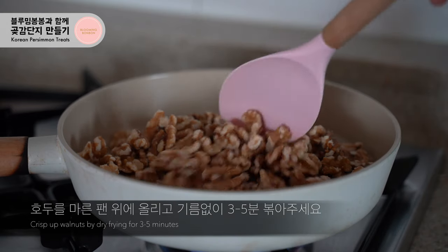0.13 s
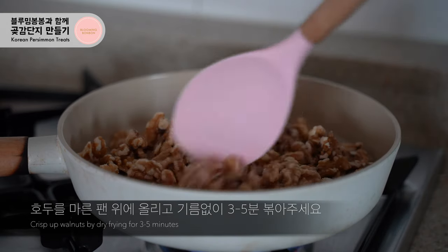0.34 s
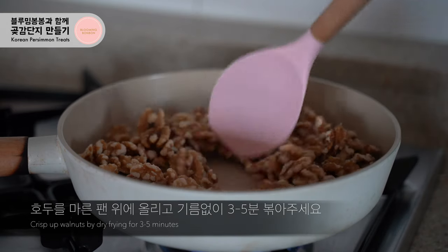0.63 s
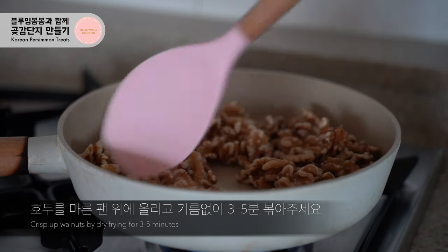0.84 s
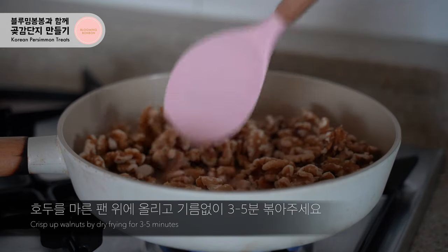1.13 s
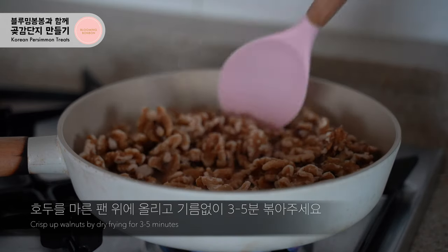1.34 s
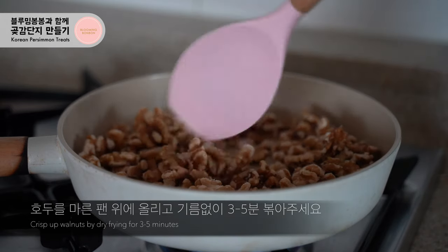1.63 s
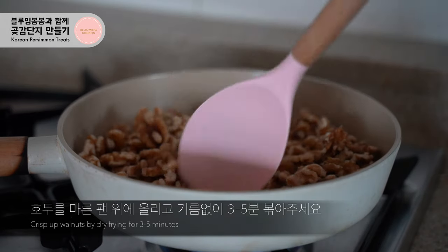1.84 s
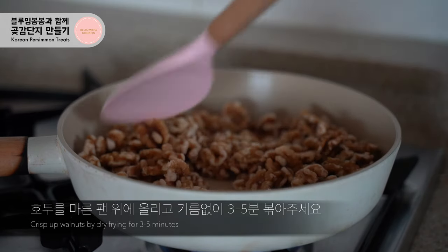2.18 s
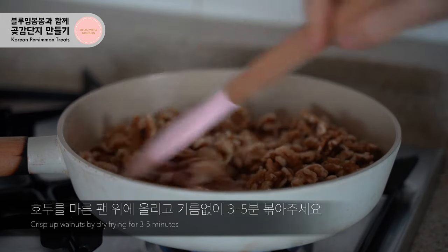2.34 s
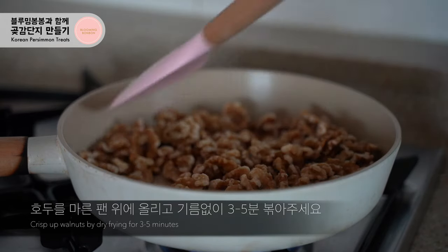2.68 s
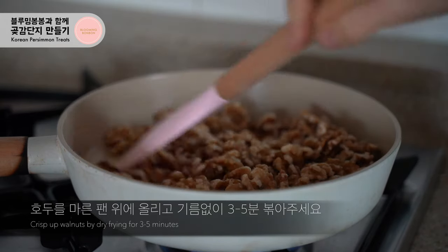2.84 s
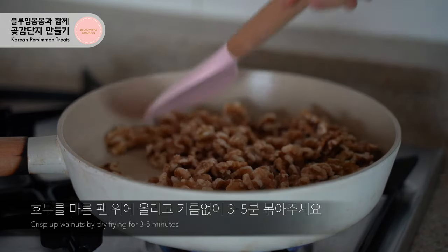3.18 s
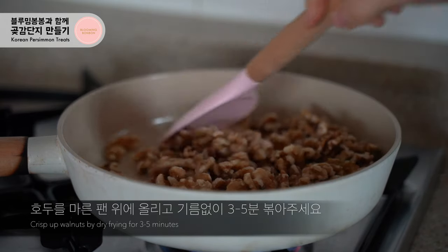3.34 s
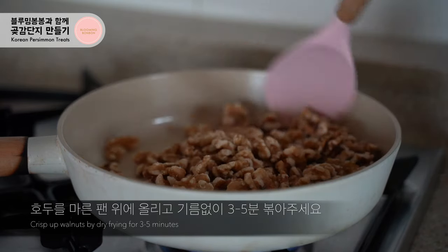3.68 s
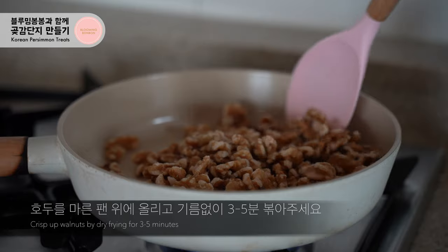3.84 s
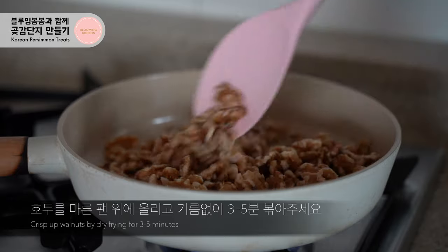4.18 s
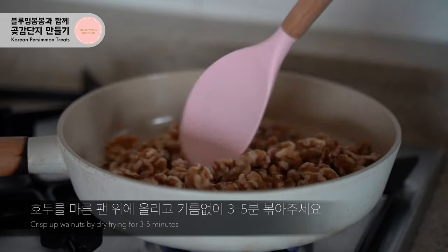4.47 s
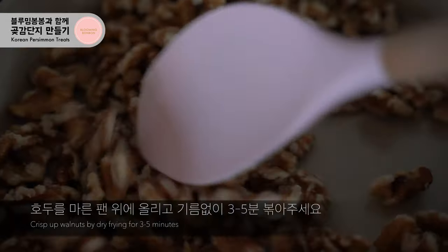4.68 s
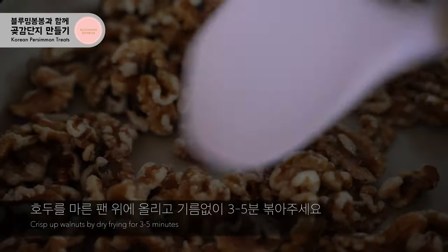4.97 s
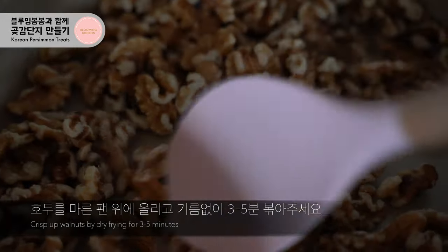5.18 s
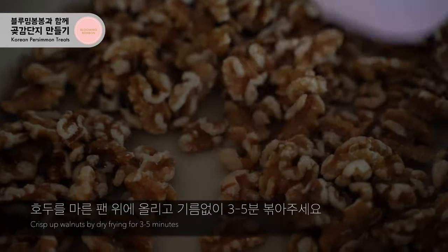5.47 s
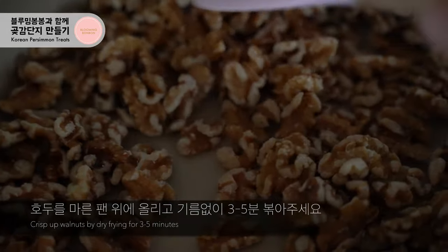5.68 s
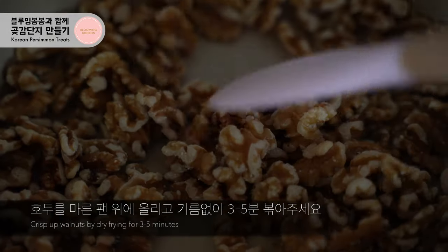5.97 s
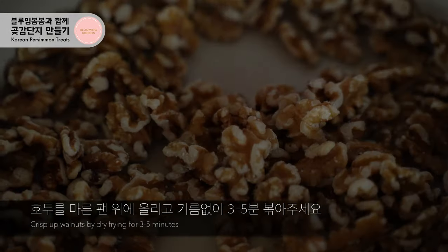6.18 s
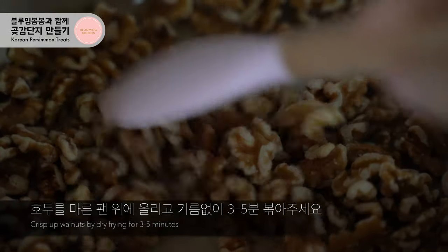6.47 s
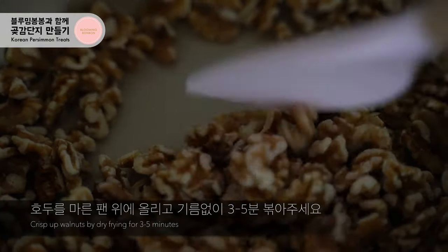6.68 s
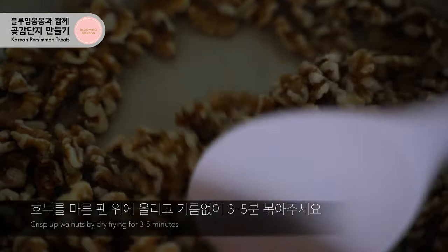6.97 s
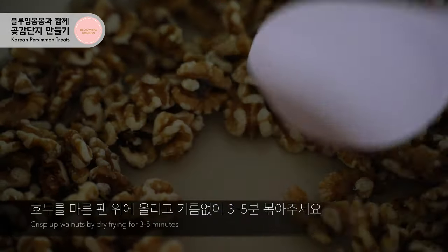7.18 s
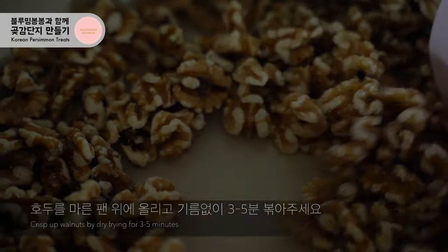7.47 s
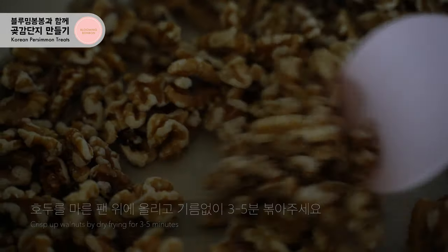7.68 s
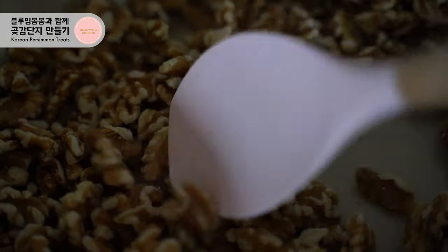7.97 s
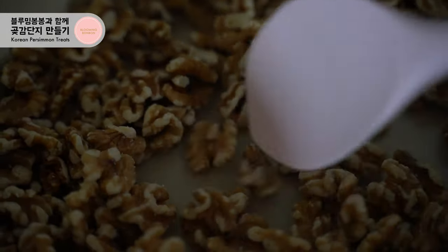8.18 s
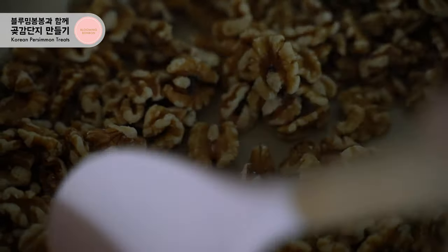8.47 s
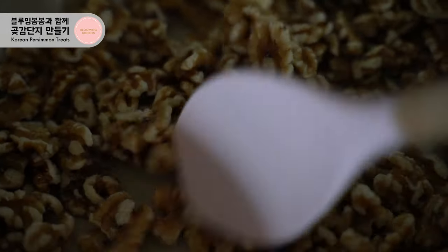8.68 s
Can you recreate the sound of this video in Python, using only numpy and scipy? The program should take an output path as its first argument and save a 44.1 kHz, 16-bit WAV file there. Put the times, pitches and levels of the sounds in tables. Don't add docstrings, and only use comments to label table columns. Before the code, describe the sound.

Steady gas hiss and a barely audible motor hum lie behind dry nuts being pushed around a pan. Heard from a little way off, they tumble in short hollow rattles, the spatula tapping lightly twice. Midway the view cuts close in a small dry room; scraping fizz, tiny crisp ticks and nut drops become vivid, with solid short knocks against the pan.

```python
import sys
import numpy as np
from scipy import signal
from scipy.fft import rfft, irfft, next_fast_len
from scipy.io import wavfile
from scipy.ndimage import map_coordinates

SR = 44100
rng = np.random.default_rng(int(sys.argv[2]) if len(sys.argv) > 2 else 0)


def gain_from_db(level_db):
    decades = np.asarray(level_db, float) / 20
    return 10 ** decades


def waveform_to_disk(signal):
    frames = np.transpose(np.atleast_2d(signal))
    scaled = np.clip(frames, -1, 1) * 32767
    samples = np.round(scaled).astype(np.int16)
    wavfile.write(sys.argv[1], SR, samples)


N = 388962
MOVE_S = 4.758
IS_FAR = np.arange(N) < MOVE_S * SR
TOP_HZ = 15745


def unit(x):
    return x / np.sqrt(np.mean(x ** 2) + 1e-20)


def along(points, hz):
    f, v = np.transpose(points)
    return np.interp(np.log(hz + 1), np.log(f + 1), v)


def wobble(rate):
    steps = np.arange(0, N + 64, 64)
    knots = rng.standard_normal(int(N * rate / SR) + 4)
    return np.interp(np.arange(N), steps, map_coordinates(knots, [steps * rate / SR]))


def filtered(x, response):
    m = next_fast_len(N + SR // 2)
    spectrum = rfft(x, m) * response(np.fft.rfftfreq(m, 1 / SR))
    return irfft(spectrum, m)[..., :N]


def grains(rate, tail_db):
    size = gain_from_db(tail_db * np.minimum(rng.exponential(size=(2, N)), 3))
    happens = rng.random((2, N)) < rate / SR
    return unit(rng.standard_normal((2, N)) * size * happens)


def resonances(modes):
    def response(f):
        total = 0
        for k, (c, w, db) in enumerate(modes):
            total = total + (-1) ** k * gain_from_db(db) * 1j * f * w / (c * c - f * f + 1j * f * w)
        return total
    return response


# pitch_hz, likeness (1 = identical)
LEFT_RIGHT_LIKENESS = [(60, .9995), (200, .985), (400, .94), (800, .93), (1400, .86), (2800, .45),
                       (5000, .1), (15000, .02)]


def half_angle(hz):
    return np.arccos(np.clip(along(LEFT_RIGHT_LIKENESS, hz), -1, 1)) / 2


def spread(pair, gain):
    def mid_side(hz):
        angle = half_angle(hz)
        return gain(hz) * [np.cos(angle), np.sin(angle)]
    mid, side = filtered(pair, mid_side)
    return unit(np.array([mid + side, mid - side]))


def add(out, s, modes, rise_s, scatter_db, detune, blur, pan_db=0):
    hz, db, t60 = np.transpose(modes)[:, :, None]
    t = np.arange(0, min(t60.max(), .1), 1 / SR)
    chance = rng.standard_normal((3, len(modes), 1))
    walk = np.cumsum(rng.standard_normal((len(modes), len(t) // 16 + 1)), axis=1)
    drift = blur * np.repeat(walk, 16, axis=1)[:, :len(t)]
    skew = np.sign(chance[1]) * half_angle(hz)
    fade = gain_from_db(db + scatter_db * chance[0] - 60 * t / np.clip(t60, .008, .15))
    fade *= (1 - np.exp(-t / rise_s)) ** 2
    turns = 2 * np.pi * hz * (1 + detune * chance[2]) * t + drift
    for side, ear in zip((1, -1), out):
        ring = fade * np.sin(turns + side * skew)
        ear[round(s * SR):][:len(t)] += gain_from_db(side * pan_db / 2) * ring.sum(0)


# pitch_hz, level_db
MOTOR_HUM = [(43.1, -91), (80.7, -92.5), (231.5, -78)]


def hum():
    t = np.arange(N) / SR
    total = 0
    for hz, db in MOTOR_HUM:
        level = gain_from_db(db + 3.5 + 1.1 * wobble(2.94))
        total = total + level * np.sin(2 * np.pi * hz * t + 1.4 * wobble(2.2))
    return total


# pitch_hz, time_to_fade_60_db_s
ROOM_FADE = [(300, 0.13), (2000, 0.29), (10000, 0.035)]


def kitchen(x):
    hz, t, z = signal.stft(rng.standard_normal((2, SR // 2)), SR, nperseg=256)
    fading = z * gain_from_db(-60 * t / along(ROOM_FADE, hz)[:, None])
    tail = signal.istft(fading, SR, nperseg=256)[1]
    delayed = np.pad(x.mean(0), (200, 0))[None]
    wet = signal.fftconvolve(delayed, tail / np.linalg.norm(tail[0]), axes=1)[:, :N]
    return spread(wet, np.ones_like) * np.std(wet)


# pitch_hz, level_db (per Hz)
HISS_FAR = [(18, -54), (30, -31.5), (130, -22.5), (225, -7.5), (641, -4), (1230, 1), (1870, -8.5),
            (4220, -4.5), (5060, -17), (8770, -18), (9490, -18.5), (15600, -18.5)]
HISS_NEAR = [(18, -53), (30, -28.5), (675, -8), (770, -5.5), (1050, -8.5), (1560, -5.5), (1970, -14),
             (2560, -6.5), (3160, -9), (4330, -9), (15600, -15.5)]
# pitch_hz, width_hz, level_db (over the hiss)
BURNER_PEAKS_FAR = [(82.5, 24, 9.5), (1400, 230, -2.5), (2467, 91, 6), (3630, 25, 13), (3880, 81, 4),
                    (4192, 77, 14), (4356, 45, 13), (7030, 260, 13.5), (9650, 78, 22.5), (11190, 150, 14.5),
                    (13620, 160, 9)]
BURNER_PEAKS_NEAR = [(87, 5, 10), (1210, 77, 4.5), (1523, 40, 7.5), (2552, 32, 7.5), (4265, 67, 11),
                     (7140, 76, 4.5), (10200, 1200, -11), (11220, 150, 9), (11500, 80, -3)]


def gas_jet(spectrum, peaks):
    def gain(hz):
        humps = 1 + sum(gain_from_db(db) / (1 + (2 * (hz - c) / w) ** 2) for c, w, db in peaks)
        return gain_from_db(along(spectrum, np.minimum(hz, TOP_HZ - 500))) * humps
    return spread(rng.standard_normal((2, N)), gain)


def burner():
    far = gain_from_db(-50.5 + 0.56 * wobble(2.6)) * gas_jet(HISS_FAR, BURNER_PEAKS_FAR)
    near = gain_from_db(-47.5 + 0.96 * wobble(2.83)) * gas_jet(HISS_NEAR, BURNER_PEAKS_NEAR)
    return np.where(IS_FAR, far, near)


def swells(rows, rise):
    s, hold, db, fade = np.transpose(rows)[:, :, None]
    t = np.arange(0, N + 44, 44) / SR
    before, after = (s - t) / rise, t - s - hold
    away = np.maximum(np.maximum(before, after), 0) / np.maximum(fade, .02)
    return np.interp(np.arange(N) / SR, t, gain_from_db(db - 20 * away).sum(0))


# full_level_s, hold_s, level_db, time_to_fade_20_db_s
ROLLING_STROKES = [(.27, 0.24, -61, 1.2), (.6, 0.11, -48, 0.52), (.98, 0.3, -50, 0.09),
                   (1.61, 0, -43, 0.26), (1.91, 0.093, -44.5, 0.1), (2.47, 0.037, -43, 0.14),
                   (2.85, 0.19, -52, 0.06), (3.43, 0, -50.5, 0.56), (4.07, 0.53, -50, 0.2),
                   (4.78, 0.19, -46, 0.23), (5.3, 0, -50.5, .5), (5.97, 0, -45.5, 0.32),
                   (6.57, 0.076, -44.5, 0.11), (7.05, 0.13, -44.5, 0.44), (7.64, 0.096, -45.5, 0.14),
                   (7.93, 0.23, -50, 0.02), (8.185, 0.084, -42, 0.07), (8.61, 0.27, -43.5, 0.24)]
# full_level_s, hold_s, level_db, time_to_fade_20_db_s
SKIN_SLIDES = [(.96, 0.03, -59, 0.05), (1.34, 0.00092, -56.5, 0.18), (1.69, 0.0064, -51.5, 0.23),
               (4.8, 0.25, -60.5, 1), (5.34, 0.023, -48, 0.07), (5.55, 0.015, -50.5, 0.02),
               (5.94, 0.0027, -52, 0.3), (6.26, 0, -56, 0), (6.59, 0.012, -50.5, 0.12),
               (7.21, 0.0023, -37, 0.15), (7.35, 0.092, -50.5, 0.08), (7.56, 0.063, -44, 0.1),
               (7.72, 0.28, -53, 0.2), (8.21, 0.01, -36.5, 0.02), (8.36, 0.5, -48.5, 0.85)]
# peak_s, level_db, time_to_fade_20_db_s
PAN_PUSHES = [(.53, -58, 0.38), (.968, -60, 0.74), (1.926, -46.5, 0.12), (2.471, -62, 1.7),
              (4.064, -55.5, 0.17), (4.264, -53, 0.24), (4.39, -54.5, .15), (4.582, -47.5, 0.15),
              (4.84, -55, 0.25), (5.29, -56.5, 0.33), (5.964, -58.5, 0.2), (6.591, -52, 0.05),
              (7.03, -53.5, 0.86), (7.182, -43, 0.09), (8.612, -52, 0.9), (8.751, -39, 0)]
# pitch_hz, width_hz, level_db
LOADED_PAN = [(807, 30.8, 7), (936, 70, -2), (1056, 84, -6.5), (1250, 340, -9.5), (1508, 100, -2.5),
              (1625, 178, -9), (2500, 660, -15.5), (3640, 280, -39)]
# pitch_hz, width_hz, level_db
PAN_ON_STAND = [(145, 103, -13), (230, 140, -9), (352.8, 19.3, 3.5), (410, 65, -3), (501, 106, 0.5)]
# pitch_hz, level_db (per Hz)
FIZZ_COLOUR = [(800, -29), (2500, -2), (5000, 0), (8800, 1), (10600, 2.5), (12500, -1.5), (16500, -6.5)]


def stirring():
    rolling = grains(rate=1600, tail_db=1.4)
    fuller_pan = np.multiply(LOADED_PAN, [1.05, 1, 1])
    roll_far = spread(rolling, resonances(fuller_pan))
    roll_near = spread(rolling, resonances(LOADED_PAN))
    roll = swells(ROLLING_STROKES, rise=0.6) * np.where(IS_FAR, roll_far, roll_near)

    shake = spread(grains(rate=1200, tail_db=1.0), resonances(PAN_ON_STAND))
    pushes = [(s, 0, db, fade) for s, db, fade in PAN_PUSHES]
    shake *= gain_from_db(1.0) * swells(pushes, rise=0.1)

    bubbles = grains(rate=1600, tail_db=0.0) + 1.4 * rng.standard_normal((2, N))
    fizz = spread(bubbles, lambda hz: gain_from_db(along(FIZZ_COLOUR, hz)))
    fizz *= gain_from_db([[-1], [1]] + 1.6 * wobble(30))
    resting = gain_from_db(np.where(IS_FAR, -62.5, -57.5))
    fizz *= gain_from_db(0.94) * (swells(SKIN_SLIDES, rise=0.64) + resting)
    return roll + shake + fizz


# start_s, level_db (peak)
SKIN_CRACKS = [(5.224, -29), (5.5277, -29), (5.614, -33.5), (5.828, -26), (5.955, -18), (6.0464, -28.5),
               (7.144, -22), (7.326, -23.5), (7.404, -40.5), (7.4893, -28), (7.537, -21.5), (7.7845, -26),
               (7.8203, -24), (7.953, -21), (8.152, -30), (8.181, -21.5), (8.2134, -27), (8.2877, -21),
               (8.4195, -23), (8.6025, -27), (8.754, -21)]


def ticks():
    out, t = np.zeros((2, N + SR)), np.arange(SR // 100) / SR
    for s, db in SKIN_CRACKS:
        crack = rng.standard_normal((2, len(t))) * gain_from_db(db - 1.5 - 60 * t / 0.0098)
        out[:, round(s * SR):][:, :len(t)] += crack
    bright = signal.butter(2, [3500, 12500], "bandpass", fs=SR, output="sos")
    return signal.sosfilt(bright, out[:, :N]) * gain_from_db([[-1.5], [1.5]])


# start_s, level_db (peak), left_minus_right_db
SPATULA_KNOCKS = [
    (0.525, -21, 1.5),
    (0.956, -17, -4),
    (5.327, -10, 2),
    (7.0233, -15.5, 1.5),
    (7.177, -11.5, -2),
    (8.603, -11.5, -0.5),
    (8.747, -12, -2),
]
# pitch_hz, level_db, time_to_fade_60_db_s (0.15 at most)
KNOCK_RINGS = [
    [(1410, -7.5, 5.0), (1860, -7.5, 0.1), (2047, -5.5, 0.1), (2500, -3.5, 0.17), (2930, -9.5, 0.11),
     (4570, -18, 0.072)],
    [(1337, -6.5, 0.11), (1865, -13, 0.11), (2610, -5, 0.026), (3300, -17.5, 0.14), (3600, -16, 0.095)],
    [(1563, -6.5, 0.061), (2140, -16, 0.055), (3000, -9, 0.036), (3870, -10, 0.061), (4090, -13, 0.05)],
    [(1675, 10.5, 0.021), (3060, -17, 0.095), (3320, -3.5, 0.067), (3960, -9, 0.041), (4790, -16, 0.092)],
    [(1520, 2.5, 0.038), (2570, -8, 0.039), (2890, -2.5, 0.023), (3870, -13, 0.065)],
    [(1720, 4, 0.033), (2450, -13, 0.032), (3370, -3.5, 0.068), (3760, -27, 0.06), (4620, -14, 0.032)],
    [(1513, 5, 0.023), (1670, -3.5, 0.036), (2500, -12, 0.1), (2920, 1, 0.021), (3350, -13, 0.031),
     (4070, -14.5, 0.056)],
]
KNOCK_CONTACTS = [0.00033, 0.005, 0.00044, 0.00051, 0.00034, 0.00023, 0.00035]


def spatula():
    out, t = np.zeros((2, N + SR)), np.arange(SR // 10) / SR
    rattle = signal.butter(2, [1000, 4500], "bandpass", fs=SR, output="sos")
    for (s, db, pan_db), ring, contact_s in zip(SPATULA_KNOCKS, KNOCK_RINGS, KNOCK_CONTACTS):
        add(out, s - .0011, np.add(ring, [0, db - 2.5, 0]), rise_s=contact_s,
            scatter_db=1.5, detune=0.0013, blur=0.056, pan_db=pan_db)
        add(out, s - .009, np.add(ring[:2], [0, db - 15, 0]), rise_s=0.0056,
            scatter_db=4.5, detune=0.021, blur=0.23)
        shape = gain_from_db(-60 * t / 0.058) * (1 - np.exp(-t / (0.0017 + contact_s)))
        burst = signal.sosfilt(rattle, rng.standard_normal((2, len(t))) * shape)
        out[:, round(s * SR):][:, :len(t)] += gain_from_db(db - 7.0) * (burst + .5 * burst[::-1])
    return out[:, :N]


# start_s, level_db (peak), middle_db, upper_db
LANDINGS = [(.173, -30, -17, -19), (.256, -31, -14, -21), (.306, -26, -14, -28),
            (.557, -21.5, -11, -30), (.584, -18, -27, -28), (0.65, -19.5, -17, -22),
            (.802, -28.5, -9, -40), (.972, -28, -2, 2), (1.094, -33.5, -18.5, -9),
            (1.153, -33, -3, -2.5), (1.213, -27.5, -31, -15), (1.4, -30.5, -3, -14.5),
            (1.538, -27, -17, -18), (1.627, -20, -27, -19), (1.916, -28, 2, -4.5),
            (1.972, -19.5, -16, -21), (1.996, -25.5, -22, -29), (2.063, -25.5, -19, -15),
            (2.439, -28, -3, -7.5), (2.499, -19, -12, -15), (2.56, -22.5, -12, -28),
            (3.01, -31, -4.5, -11.5), (3.548, -31.5, -3, -6.5), (4.055, -25.5, 0.5, -14),
            (4.213, -21.5, -16, -36), (4.27, -26.5, -4, -14), (4.38, -18.5, -1.5, -14.5),
            (4.425, -21, 0, -12), (4.524, -21, -14, -33), (4.578, -22.5, -0.5, -6),
            (4.761, -24.5, -1, -21), (4.843, -19, -3, -14.5), (4.899, -24.5, -27, -17),
                 (4.936, -17, -5, -16.5), (4.986, -25, -29, -27), (5.022, -24.5, -7.5, -22),
                 (5.052, -25, -8, -24), (5.246, -29.5, -2, -10), (5.268, -14, -2, -16),
                 (5.328, -17, -6.5, -9.5), (5.385, -28.5, -19, -12), (5.925, -23.5, -5, -16),
                 (5.951, -22, -4.5, -11.5), (5.98, -23.5, -5, -30), (6.56, -24.5, -5.5, -15.5),
                 (6.632, -21, -4, -21), (6.829, -23.5, -1.5, -19), (7.024, -16, -0.5, -5),
                 (7.069, -22, -1, -14.5), (7.179, -22.5, -2.5, -3.5), (7.257, -23, -17, -18.5),
                 (7.672, -30.5, 0.5, -21), (7.936, -19, -8.5, -36), (7.987, -25, -8, -32),
                 (8.17, -16, -6, -25), (8.257, -23.5, -22, -38), (8.416, -33.5, -1.5, -1),
                 (8.6055, -16, -0.5, -3.5), (8.657, -20.5, 0.5, -15), (8.748, -18, -1, -10.5)]
# start_s, level_db (peak), floor_pitch_hz, middle_db
LIGHT_TUMBLES = [(0.387, -42, 880, -12), (0.449, -36.5, 907, -14), (0.596, -35, 905, -10),
                 (0.621, -28, 815, -14), (0.711, -34.5, 851, -13), (0.926, -33, 894, -9.5),
                 (1.016, -33, 893, -4.5), (1.058, -39, 880, -9), (1.109, -36, 821, -7.5),
                 (1.24, -28, 900, -17), (1.262, -39, 797, -14), (1.5, -42, 910, -7),
                 (1.559, -32, 950, -8), (1.581, -35, 840, -10), (1.606, -28.5, 850, -3),
                 (1.654, -34, 990, -5.5), (1.667, -36, 920, -12), (1.69, -41.5, 786, -4.5),
                 (1.872, -34.5, 885, -11.5), (1.901, -40, 900, -15), (1.953, -31, 850, -8.5),
                 (2.031, -34, 824, -11), (2.362, -35.5, 894, -15), (2.416, -39, 845, -10),
                 (2.46, -30, 802, -7.5), (2.54, -34, 918, -12), (2.845, -38, 900, -15),
                 (2.877, -45, 818, -14), (2.947, -38.5, 950, -12), (2.96, -36, 900, -17),
                 (2.993, -34, 930, -11), (3.422, -33.5, 870, -18), (3.446, -34, 805, -29),
                 (4.063, -37, 870, -12), (4.089, -27.5, 840, -9.5), (4.119, -31, 840, -11),
                 (4.181, -37, 964, -6.5), (4.257, -33.5, 872, -6.5), (4.302, -32, 945, -15),
                 (4.396, -28.5, 920, -4), (4.444, -34, 980, -10), (4.48, -35, 842, -12),
                 (4.544, -34, 915, -12), (4.594, -31, 783, -6), (4.629, -31, 910, -5),
                 (4.783, -31, 910, -7.5), (5.001, -31, 851, -10), (5.232, -41, 840, -7),
                      (5.373, -36, 844, -5.5), (5.419, -37, 810, -6), (5.443, -36, 850, -8),
                      (6.006, -33.5, 894, -6), (6.055, -33, 855, -1.5), (6.592, -32, 810, -6.5),
                      (6.613, -29, 789, -7.5), (6.814, -45, 850, -8), (6.923, -40.5, 824, -5),
                      (6.959, -35, 837, -6), (7.112, -31, 850, -6.5), (7.134, -48, 790, -12),
                      (7.321, -41, 850, -4.5), (7.516, -37.5, 770, -12), (7.639, -38, 818, -4),
                      (7.695, -31, 827, -7), (7.724, -45, 865, -5.5), (7.783, -39, 820, -8),
                      (7.83, -38, 907, -3), (7.846, -35.5, 860, -6), (7.895, -42, 861, -11),
                      (7.924, -28, 786, -8), (8.007, -31, 840, -8), (8.025, -35, 827, -12),
                      (8.059, -35.5, 851, -7), (8.101, -39.5, 845, -8), (8.12, -32, 848, -19),
                      (8.14, -35, 851, -11), (8.154, -31.5, 830, -14), (8.182, -21, 840, -8.5),
                      (8.209, -32, 850, -7), (8.235, -32.5, 806, -6.5), (8.271, -28.5, 857, -14),
                      (8.324, -39, 840, -10), (8.514, -47.5, 810, -9), (8.629, -30, 775, -8),
                      (8.678, -35.5, 810, -8), (8.736, -26, 870, -2.5), (8.782, -28.5, 829, -6.5),
                 (0.759, -43, 832, -9), (0.952, -33, 880, -10), (0.984, -28, 894, -7),
                  (1.184, -38, 934, -10), (1.596, -33, 912, -3), (2.004, -35, 930, -6.5),
                  (2.446, -31, 860, -9), (2.491, -23, 818, -9), (2.513, -29, 796, -9),
                  (2.581, -37, 791, -6), (2.614, -42.5, 816, -6), (4.864, -33, 840, -6),
                  (4.954, -26, 845, -8), (5.284, -26, 907, -7.5), (5.804, -38.5, 870, -7),
                  (5.963, -27, 834, -7), (6.4, -43.5, 880, -9), (6.57, -27, 810, -9), (6.651, -33, 856, -6),
                  (7.039, -31, 891, -7.5), (7.084, -37, 861, -7.5), (7.199, -34, 807, -14),
                  (7.274, -37, 830, -8), (8.759, -30, 760, -6)]
FLOOR_PITCH = (896, 851)
FLOOR_FADE = (0.02, 0.025)
# pitch_hz, level_db, time_to_fade_60_db_s
FLOOR_RINGS = [(1174, -9.5, 0.056), (1410, -1.5, 0.029), (1548, -0.5, 0.044), (1658, -2.5, 0.038)]
# pitch_hz, level_db, time_to_fade_60_db_s
WALL_RINGS = [(1988, -1, 0.045), (2348, 1, 0.06), (2530, 4, 0.034), (3006, 1.5, 0.056), (3546, -3.5, 0.058),
              (4008, 5.5, 0.031)]


def nuts():
    out = np.zeros((2, N + SR))
    hits = []
    for s, db, middle_db, upper_db in LANDINGS:
        hits.append((s, db, FLOOR_PITCH[s > MOVE_S], middle_db, upper_db))
    for s, db, hz, middle_db in LIGHT_TUMBLES:
        hits.append((s, db + 2, hz, middle_db, middle_db - 9))
    for s, db, hz, middle_db, upper_db in hits:
        t60 = FLOOR_FADE[s > MOVE_S]
        contact_s = 0.002652 * np.clip(-upper_db / 16, .4, 1)
        low_db = db + 10 * np.log10(np.clip(1 - gain_from_db(2 * middle_db), .08, 1))
        floor = [(hz, low_db + 10, t60), (hz * 1.144, low_db + 1.3, t60)]
        middle = np.add(FLOOR_RINGS, [0, db + middle_db - 1, 0])
        upper = np.add(WALL_RINGS, [0, db + upper_db - 4.5, 0])
        click = [(5000, db + upper_db - 11, .02), (6000, db + upper_db - 18, .015)]
        add(out, s - contact_s, floor, rise_s=contact_s, scatter_db=1.4, detune=0.018, blur=0.015)
        add(out, s - .002, middle, rise_s=.0022, scatter_db=3, detune=.025, blur=.16)
        add(out, s - .0016, upper, rise_s=.0018, scatter_db=3, detune=.025, blur=.24)
        add(out, s - .0008, click, rise_s=.0006, scatter_db=2, detune=.05, blur=.45)
    return out[:, :N]


def scene():
    no_bass = signal.butter(6, 660, "highpass", fs=SR, output="sos")
    hits = signal.sosfilt(no_bass, nuts() + spatula()) + ticks()
    lean_db = np.where(IS_FAR, .4, -.35)
    pan = hits + gain_from_db(-11.5) * kitchen(hits) + stirring() + burner()
    return pan * gain_from_db([lean_db, -lean_db]) + hum()


def low_pass(x):
    return signal.sosfilt(signal.butter(12, 16670, fs=SR, output="sos"), x)


def record(dry):
    def response(hz):
        lift = gain_from_db(np.clip((hz - 13500) / 500, 0, 4))
        bass_cut = 1 + (34 / (hz + 1)) ** 8
        return lift * (hz < TOP_HZ) / bass_cut
    return low_pass(filtered(dry, response))


dry = scene()
out = record(dry)
waveform_to_disk(out)
```